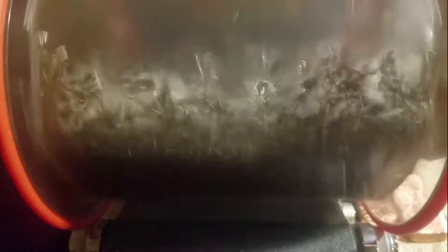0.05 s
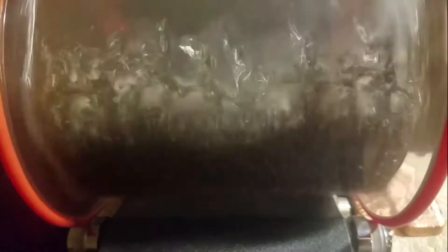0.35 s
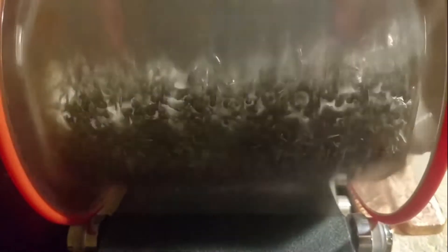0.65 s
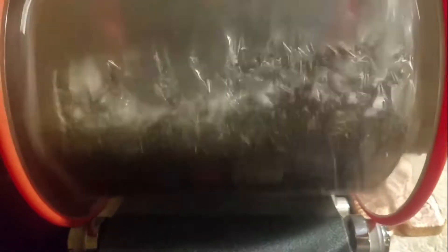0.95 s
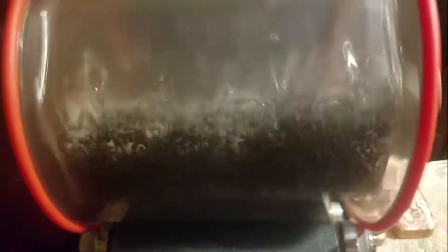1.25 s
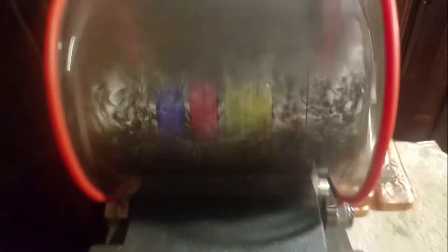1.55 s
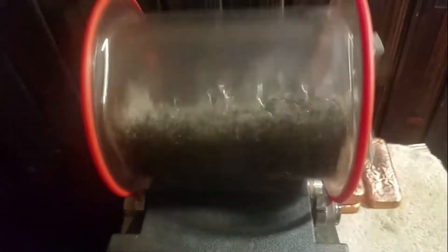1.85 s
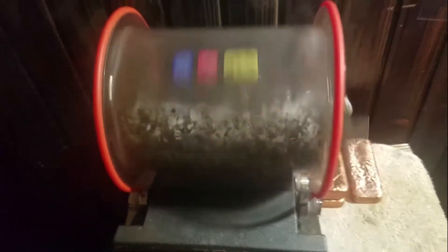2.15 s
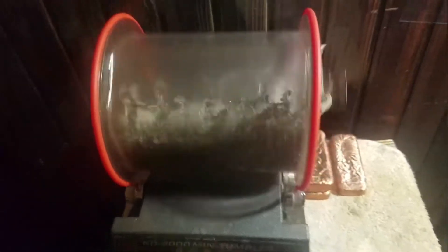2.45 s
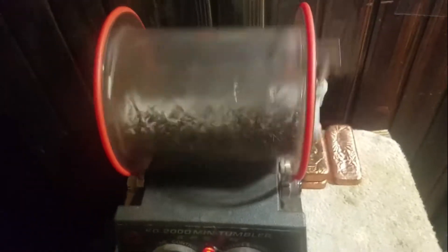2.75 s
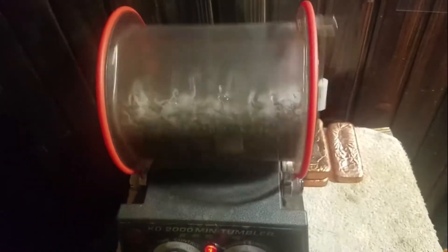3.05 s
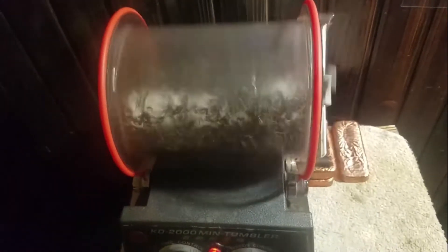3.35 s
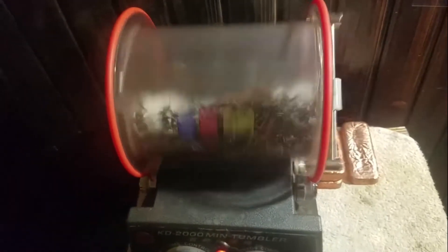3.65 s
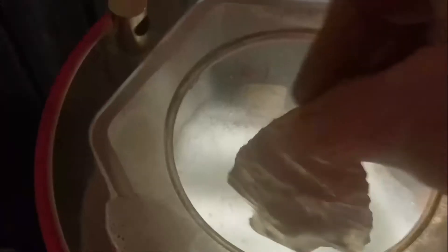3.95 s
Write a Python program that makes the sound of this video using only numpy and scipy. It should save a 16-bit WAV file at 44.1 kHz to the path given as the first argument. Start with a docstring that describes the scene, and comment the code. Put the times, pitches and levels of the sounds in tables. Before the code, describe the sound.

Small metal pieces rattle in a spinning plastic tumbler drum, then stop dead.

```python
"""A steady churn and a bright sizzle of metal on metal: small steel pieces tumble in a motor-driven plastic
drum, close to a handheld stereo microphone. Clumps drop on the drum wall with hollow knocks, whose deepest thud
fades as the microphone slowly backs away. The rattle breaks off at 3.71 s and the scene changes: after a short
silence a faint machine hum comes up."""
import sys
import numpy as np
from scipy import signal
from scipy.fft import rfft, irfft
from scipy.io import wavfile
from scipy.ndimage import uniform_filter1d

SR = 44100
rng = np.random.default_rng(int(sys.argv[2]) if len(sys.argv) > 2 else 0)


def wav_out(sig):
    """Save sig, one row per channel (or a flat mono array), as 16-bit PCM at SR to the path in sys.argv[1]."""
    wavfile.write(sys.argv[1], SR, np.round(np.clip(np.atleast_2d(sig).T, -1, 1) * 32767).astype(np.int16))


N = 176400

# clumps landing on the drum wall: (time [s], length [s], level [dB], bass weight [dB], treble weight [dB])
LANDINGS = [(0.015, 0.0086, -42, -10, -7), (0.055, 0.0044, -32.5, -22, -10),
            (0.069, 0.01, -41.5, -3.5, -1.0), (0.1, 0.017, -46.5, -13.5, -4.5),
            (0.163, 0.0051, -41.0, 2, 1), (0.177, 0.019, -43, -23, -5), (0.261, 0.024, -45, -4, -9),
            (0.336, 0.0075, -36, -16, -19), (0.352, 0.042, -41.5, -25, -7), (0.367, 0.012, -37, -10.0, -14),
            (0.411, 0.018, -41, -7.5, -9), (0.498, 0.067, -49, -9, -5.0), (0.568, 0.0067, -35.5, -4, -17.5),
            (0.616, 0.024, -48.5, 3.5, 2), (0.713, 0.008, -40.5, -1, -6.0), (0.725, 0.03, -45.5, -12.5, -8),
            (0.794, 0.0081, -33, -8, -13), (0.843, 0.037, -42, -8.5, -11.5),
            (0.942, 0.017, -38.5, -14.5, -6.5), (0.984, 0.008, -44.5, -20, -1),
            (1.033, 0.042, -44, -12.5, -3.5), (1.115, 0.015, -44, -3.5, 1),
            (1.155, 0.0098, -43.5, -9.5, -5), (1.196, 0.0052, -32, -7, -20), (1.221, 0.019, -46.5, -8, 0),
            (1.242, 0.012, -44.5, -2, -16), (1.318, 0.01, -40, -14.5, -6), (1.332, 0.021, -45.5, -5.5, -3),
            (1.427, 0.052, -49, -4.5, -1.0), (1.52, 0.012, -41.5, -15, -2.5), (1.53, 0.0044, -39.5, 1, -10),
            (1.558, 0.023, -42, -15.5, -14.5), (1.609, 0.041, -49.0, -9.5, 2),
            (1.657, 0.0032, -29.5, -17, -19), (1.717, 0.032, -43.5, -6.5, -6),
            (1.809, 0.055, -48, -9.5, -4), (1.881, 0.012, -37.5, -11, -10), (1.959, 0.016, -44, -8.5, -3),
            (2.005, 0.016, -52.5, -5, 5), (2.03, 0.0083, -46, -2, -1), (2.061, 0.013, -39, -12, -5),
            (2.103, 0.0033, -35.5, -8, -4), (2.16, 0.041, -45.5, -8, -6),
            (2.269, 0.042, -45.5, -16.5, -8.5), (2.361, 0.013, -38, -28, -5), (2.379, 0.0062, -38, -7, -14),
            (2.439, 0.016, -41, -9.5, -5.5), (2.47, 0.0066, -40.5, -13.0, -7),
            (2.53, 0.026, -46.5, -7, 0.5), (2.618, 0.016, -50, 1.5, 2), (2.641, 0.022, -49.5, -19, -3.5),
            (2.721, 0.0086, -37, -18.5, -14.5), (2.818, 0.006, -39.5, -20.5, -14.5),
            (2.867, 0.012, -34.5, -15, -14), (2.891, 0.015, -42.5, -12.5, -2),
            (2.942, 0.023, -43.5, -6.5, -17), (2.982, 0.022, -43.5, -33, -10),
            (3.033, 0.025, -48.5, -18, 0.0), (3.049, 0.0098, -40.0, -10.5, -10),
            (3.147, 0.041, -48, -9.5, -2), (3.231, 0.032, -45.5, -15.5, -1),
            (3.314, 0.025, -44.5, -9.0, -5.5), (3.402, 0.014, -41.5, -7.5, -5.5),
            (3.496, 0.025, -47.5, -6, 1), (3.609, 0.016, -46, -37, -4.5), (3.672, 0.063, -53, -7.5, -0.5)]


def amp(db):
    """Decibels to gain."""
    return 10 ** (np.asarray(db) / 20)


def unit_rms(x):
    """Scales to rms 1."""
    return x / np.sqrt(np.mean(x ** 2) + 1e-20)


def curve_at(points, hz):
    """Reads a table on a log-frequency axis."""
    freqs, values = np.transpose(points)
    return np.interp(np.log(hz + 1), np.log(freqs + 1), values)


def fader(points):
    """Gain over time from (time [s], level [dB]) points."""
    return amp(np.interp(np.arange(N) / SR, *np.transpose(points)))


def add(mix, start_s, sound):
    """Mixes a sound in at a time."""
    start = round(start_s * SR)
    sound = sound[:, max(-start, 0):]
    part = mix[:, max(start, 0):][:, :sound.shape[1]]
    part += sound[:, :part.shape[1]]


def response(points, size=4096):
    """Minimum-phase impulse response from (frequency [Hz], gain [dB]) points."""
    log_gain = np.log(amp(curve_at(points, abs(np.fft.fftfreq(size, 1 / SR)))))
    return np.fft.ifft(np.exp(np.conj(signal.hilbert(log_gain)))).real[:size // 2]


def through(x, impulse):
    """Plays each channel through an impulse response."""
    return signal.fftconvolve(x, np.atleast_2d(impulse), axes=1)[:, :x.shape[1]]


def flutter(slow_hz, fast_hz):
    """Random wander of rms 1 between two rates."""
    hz = np.fft.rfftfreq(N, 1 / SR)
    band = hz / (hz + slow_hz) / (1 + (hz / fast_hz) ** 2)
    return unit_rms(irfft(rfft(rng.standard_normal(N)) * band, N))


def impacts(per_s, spread_db, size):
    """Random clicks in two channels that share their timing but not their strength or sign."""
    strength = amp(spread_db * np.minimum(rng.exponential(1, (2, size)), 3))
    return (rng.random(size) < per_s / SR) * strength * np.sign(rng.standard_normal((2, size)))


def landing_bumps(lag_s=0.0028, width_s=0.016):
    """A smooth bump for each landing, by its weight; mean 0, rms 1."""
    t = np.arange(0, N, 64) / SR
    bumps = np.zeros_like(t)
    for start_s, length_s, db, *_ in LANDINGS:
        offset = (t - start_s - length_s / 2 - lag_s) / (width_s + length_s / 2)
        bumps += amp(db) * np.sqrt(length_s) * np.exp(-offset ** 2)
    return np.interp(np.arange(N) / SR, t, unit_rms(bumps - bumps.mean()))


def churn(wall, contacts_per_s=2200):
    """Pieces roll along the drum and keep its wall sounding with dense small contacts."""
    # loudness of the rolling: (time [s], level [dB])
    churn_levels = [(0, -51), (3.7, -53)]
    rolling = rng.standard_normal((2, N)) * (rng.random(N) < contacts_per_s / SR)
    return fader(churn_levels) * unit_rms(through(rolling, wall))


def sizzle(ticks_per_s=14000, smear_s=0.0011, dip_db=0.47, flutter_db=1.17, kinds=8, size=512):
    """Thousands of tiny steel ticks, each smeared inside the drum; every landing stills them slightly."""
    # colour of metal on metal: (frequency [Hz], left gain [dB], right gain [dB])
    steel_colour = [(1500, -28.5, -18), (3150, -10, -14), (4080, -15, -12), (5260, -18.5, -11),
                    (5460, -16, -18.5), (7260, -12.5, -32), (9000, -11, -27.5), (9500, -13, -13),
                    (9760, -14, -19.5), (11300, -7, -16.5)]
    # its bright top end: (frequency [Hz], left gain [dB], right gain [dB])
    steel_top = [(12600, -2.3, -17.3), (13500, 0, -14.7), (14600, -.3, -13), (15700, .2, -12.8)]
    # loudness of the ticks: (time [s], level [dB])
    sizzle_levels = [(0, -40.5), (1.2, -40), (2.6, -41.5), (3.7, -42)]
    t, ticks = np.arange(size) / SR, np.zeros((2, N))
    for _ in range(kinds):
        burst = rng.standard_normal((2, size)) * np.exp(-t / smear_s)
        smear = irfft(np.exp(1j * np.angle(rfft(burst))))  # the burst's phase with a flat spectrum
        contacts = (rng.random(N) < ticks_per_s / kinds / SR) * np.sign(rng.standard_normal((2, N)))
        ticks += through(contacts, smear)
    colour = np.vstack([steel_colour, steel_top])
    bright = through(ticks, [response(colour[:, [0, 1]]), response(colour[:, [0, 2]])])
    waver_db = flutter_db * flutter(slow_hz=1.6, fast_hz=21.9) - dip_db * landing_bumps()
    return fader(sizzle_levels) * unit_rms(bright * amp(waver_db))


def clacks(per_s=150, low_hz=770, high_hz=2916, decay_s=0.0048, db=-53.5, pitches=32):
    """Single pieces strike the drum, each with its own short pitch, hardest around the landings."""
    t, strikes = np.arange(2048) / SR, np.zeros((2, N))
    for hz in np.geomspace(low_hz, high_hz, pitches):
        tilt = amp(-3 * np.log2(hz / low_hz))  # 3 dB softer per octave
        tone = tilt * np.sin(2 * np.pi * hz * t) * np.exp(-t / decay_s)
        strikes += through(impacts(per_s / pitches, spread_db=2, size=N), tone)
    swell_db = 3 * np.tanh(landing_bumps())
    return amp(db) * unit_rms(strikes * amp(swell_db))


def knock_balance(knock, bass_db, treble_db, bass_hz=502, treble_hz=1303):
    """Sets the bass, middle and treble of a knock each to its own level."""
    hz, spectrum = np.fft.rfftfreq(knock.shape[1], 1 / SR), rfft(knock)
    bass = 1 / (1 + (hz / bass_hz) ** 6)
    treble = 1 - 1 / (1 + (hz / treble_hz) ** 6)
    bands = [(bass, bass_db), (1 - bass - treble, -2.5), (treble, treble_db - 1.5)]
    return sum(amp(db) * np.array([unit_rms(channel) for channel in irfft(spectrum * band)])
               for band, db in bands)


def clump(start_s, length_s, db, bass_db, treble_db, wall, size=8192):
    """Early pieces, a main blow and a dying scatter hit one spot of the wall; gives (time, sound)."""
    early_s, contact_s, push_s, tight_s = 0.0074, 0.001, 0.00073, 0.0064
    t = (np.arange(size) - size // 8) / SR
    shower = np.where(t < 0, amp(-14) * np.exp(-abs(t) / early_s), np.exp(-abs(t / length_s) ** 1.62))
    scatter = unit_rms(impacts(per_s=1400, spread_db=3, size=size) * shower)
    blow = unit_rms(rng.standard_normal((2, size)) * (t >= 0) * np.exp(-abs(t) / contact_s))
    push = np.outer([1, 0], np.sin(np.pi * np.clip(t / push_s, 0, 1)))  # the weight dents the wall
    tightness = tight_s / length_s  # a tight clump lands mostly in its main blow
    knock = unit_rms(through(scatter + amp(1.5) * tightness * blow, wall))
    knock += amp(-5) * tightness * unit_rms(through(push, wall)) / np.sqrt(2)
    spot_hz, spot_db = 258 * np.arange(24), 6 * rng.uniform(-0.53, 1, size=24)
    spot = response(np.column_stack([spot_hz, spot_db]))  # each spot has its own colour
    knock = knock_balance(through(knock, spot), bass_db, treble_db)
    return start_s + t[0], amp(db + 0.28) * np.sqrt(length_s * SR / size) * knock


def panel_ring(hz, db, rise_s=0.0067, decay_s=0.0063):
    """A struck panel of the wall swells into one hollow tone and dies away."""
    t = np.arange(4096) / SR
    swell = (1 - np.exp(-t / rise_s)) * np.exp(-t / decay_s)
    tone = np.sqrt(2) * np.sin(2 * np.pi * (hz * t + rng.random((2, 1))))
    return amp(db) * swell / swell.max() * tone


def drum():
    """The plastic wall, sounded by rolling pieces, single strikes and falling clumps."""
    # resonances of the wall: (frequency [Hz], gain [dB])
    wall_colour = [(25, -37.5), (48, -29.5), (62, -18), (74, -13.5), (120, -8), (165, -5.5), (210, -1),
                   (260, -2.5), (310, 3), (350, -1), (390, -1.5), (445, -6.5), (540, 0), (590, -2.5),
                   (660, 0), (750, -7.5), (900, 1), (1020, -1.5), (1200, -7), (1360, 1), (1650, -4),
                   (2000, -4.5), (2700, -8.5), (3400, -16), (4900, -17.5), (6500, -28.5), (12000, -47.5)]
    # hits that set a panel ringing: (time [s], pitch [Hz], level [dB])
    panel_hits = [(0.358, 860, -41), (1.317, 888, -41), (1.875, 1383, -42.5), (1.969, 1360, -40.5),
                  (2.636, 1400, -44.5), (2.869, 1345, -55.5), (3.314, 870, -41), (3.669, 1367, -42.5)]
    wall = response(wall_colour)
    mix = churn(wall) + clacks()
    for landing in LANDINGS:
        add(mix, *clump(*landing, wall))
    for start_s, hz, db in panel_hits:
        add(mix, start_s, panel_ring(hz, db))
    return mix


def backing_away(sound, deep_hz=120, start_db=1, fade_db_per_s=3.5):
    """The deepest thud fades as the microphone backs away from the drum."""
    deep = signal.sosfilt(signal.butter(1, deep_hz, fs=SR, output="sos"), sound)
    return sound + deep * (amp(start_db - fade_db_per_s * np.arange(N) / SR) - 1)


def stereo_microphone(sound, right_lag_s=0.00009):
    """Blends two unrelated channels into the drum at the microphone: narrow lows, wide highs."""
    # left minus right: (frequency [Hz], balance [dB])
    balance = [(200, -2), (450, -.5), (900, -0.5), (1400, -2), (1900, -8), (2500, -5.5), (3200, -1.5),
               (4700, -1)]
    # likeness of left and right: (frequency [Hz], coherence [0-1])
    coherence = [(50, .6), (150, 0.89), (650, 0.89), (1000, 0.76), (1400, 0.56), (1750, 0), (5000, 0.29)]
    hz, (common, separate) = np.fft.rfftfreq(N, 1 / SR), rfft(sound)
    alike = np.clip(curve_at(coherence, hz), 0, 1)
    leftward = amp(curve_at(balance, hz) / 2)
    right = (alike * common + np.sqrt(1 - alike ** 2) * separate) * np.exp(-2j * np.pi * hz * right_lag_s)
    return irfft(np.array([common * leftward, right / leftward]), N)


def clinks(decay_s=0.003, size=2048):
    """One piece hits another sharply, with a brief bright ring."""
    # steel striking steel: (time [s], level [dB])
    clink_hits = [(2.886, -41.5)]
    # resonance of the piece: (frequency [Hz], gain [dB])
    clink_colour = [(1500, -26), (2800, -8.5), (3500, -5), (4700, 6), (6000, -11), (9000, -27)]
    decay = np.exp(-np.arange(size) / SR / decay_s)
    mix = np.zeros((2, N))
    for start_s, db in clink_hits:
        bright = unit_rms(through(rng.standard_normal((2, size)), response(clink_colour)))
        add(mix, start_s, amp(db) * bright * decay)
    return mix


def machine_hum(start_s=3.83, rise_db_per_s=41.5, air_start_db=-87):
    """Faint machine tones and airy noise come up after the silence."""
    # tones of the machine: (frequency [Hz], starting level [dB])
    hum_tones = [(340, -98), (479, -98.5), (813, -90.5), (1220, -106)]
    # colour of the noise around them: (frequency [Hz], gain [dB])
    air_colour = [(35, -45), (70, -31), (170, -9), (330, 1.5), (550, -12), (800, -6), (1400, -19),
                  (2150, -10), (2800, -11), (3600, -23), (6000, -32), (15000, -30)]
    t = np.arange(N) / SR - start_s
    tones = sum(amp(db) * np.sqrt(2) * np.sin(2 * np.pi * (hz * t + rng.random())) for hz, db in hum_tones)
    noise = rng.standard_normal((2, N)) + 0.52 * rng.standard_normal(N)  # partly common to both sides
    air = amp(air_start_db) * unit_rms(through(noise, response(air_colour)))
    return (tones + air) * (t > 0) * amp(rise_db_per_s * np.maximum(t, 0))


def scene():
    """The rattle from close by until its sudden stop, then the hum."""
    stop_s, drop_db, fade_db_per_s = 3.7095, -14, 1400
    since_stop = np.arange(N) / SR - stop_s
    running = np.where(since_stop < 0, 1, amp(drop_db - fade_db_per_s * np.maximum(since_stop, 0)))
    rattle = stereo_microphone(backing_away(drum())) + sizzle() + clinks()
    return rattle * running + machine_hum()


def record(dry):
    """A quick, soft limiter rounds the hardest knocks; a steep low-pass trims the top."""
    threshold_db, window_s, cutoff_hz = -32.5, 0.0012, 15780
    window = round(window_s * SR)
    power = abs(uniform_filter1d((dry ** 2).mean(0), window))
    limited = dry / np.sqrt(1 + uniform_filter1d(power, window) / amp(threshold_db) ** 2)
    low_pass = signal.firwin(1023, cutoff_hz, window=("kaiser", 8), fs=SR)
    return signal.oaconvolve(limited, low_pass[None], "same")


dry = scene()
out = record(dry)
wav_out(out)
```